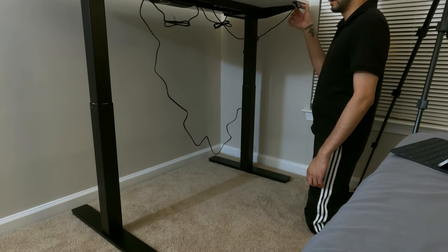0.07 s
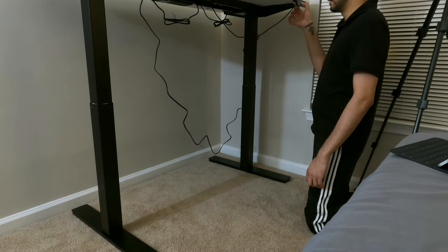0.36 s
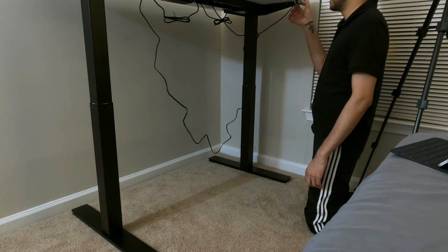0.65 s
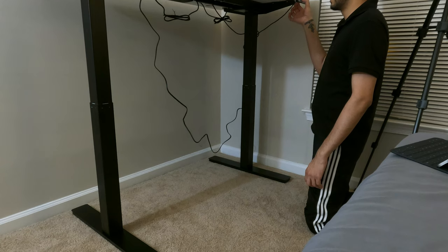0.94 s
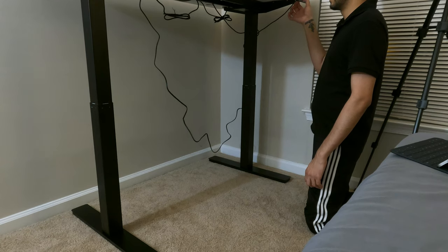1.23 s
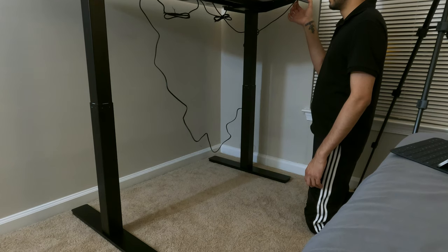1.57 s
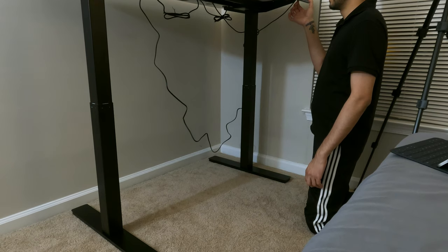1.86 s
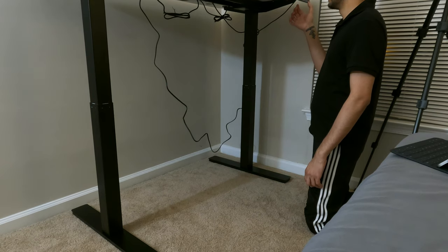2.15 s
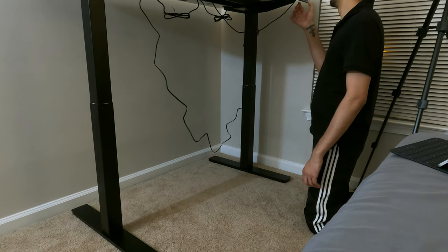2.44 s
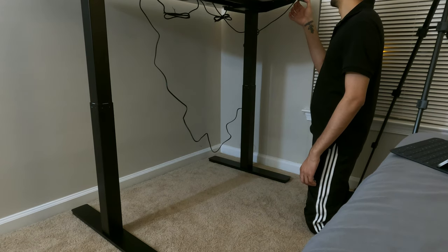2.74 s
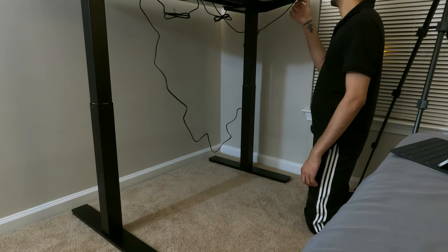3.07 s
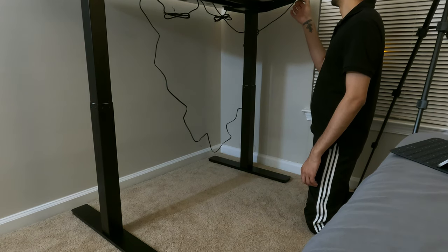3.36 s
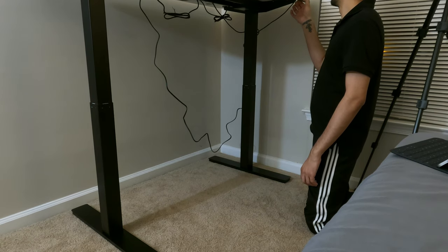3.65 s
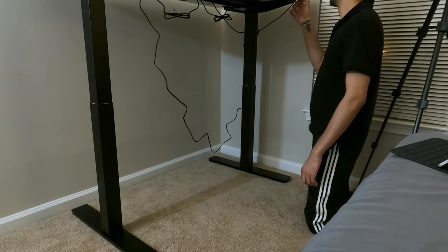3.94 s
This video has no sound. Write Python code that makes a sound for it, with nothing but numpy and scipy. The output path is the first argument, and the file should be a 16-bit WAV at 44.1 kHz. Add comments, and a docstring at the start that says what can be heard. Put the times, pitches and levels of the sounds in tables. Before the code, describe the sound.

A standing desk's motors whine steadily with a light rasp and low gear rumble in a small carpeted room. From about 0.8 seconds the pitch falls, with faint squeaks and a knock near 1.3 seconds. The desk stops at 1.7 seconds with a quick clatter and a deep shudder. A low, wavering appliance hum continues, with one sharp click at about 3.3 seconds.

```python
"""A steady whine comes first: the two leg motors of a standing desk, in a small carpeted bedroom.
Armatures sing, brushes rasp once a half turn, the columns slide and the gears rumble in the frame;
an appliance hums behind, beating against the mains. As the motors ramp down the whine falls, the
drive squeaks and the frame knocks. A quick clatter marks the stop, a deep shudder follows, and later
comes one sharp click."""
import sys
import numpy as np
from scipy import signal
from scipy.fft import rfft, irfft
from scipy.io import wavfile
from scipy.ndimage import uniform_filter1d, map_coordinates

SR = 44100
rng = np.random.default_rng(int(sys.argv[2]) if len(sys.argv) > 2 else 0)


def transcribe(signal):
    """Save signal, clipped to [-1, 1], as a 16-bit WAV file at the path in sys.argv[1]."""
    frames = np.atleast_2d(signal).T
    limited = np.clip(frames, -1, 1)
    pcm = np.round(limited * 32767).astype(np.int16)
    wavfile.write(sys.argv[1], SR, pcm)


N = 176400
T = np.arange(N) / SR
SHAFT_HZ, BRAKE_S, STOP_S = 81.03, .775, 1.69


def undb(db):
    """Amplitude grows tenfold for every 20 dB."""
    return 10 ** (np.asarray(db) / 20)


def unit(x):
    """Normalisation to rms 1."""
    return x / np.sqrt(np.mean(x ** 2))


def curve(table, column=1):
    """Gain envelope, interpolated in decibels between rows of time and level."""
    rows = np.array(table)
    return undb(np.interp(T, rows[:, 0], rows[:, column]))


def walk(rate):
    """Random modulation: about `rate` steps a second, smoothed, at rms 1."""
    k = int(SR / rate)
    steps = np.repeat(rng.standard_normal(N // k + 2), k)
    return unit(uniform_filter1d(uniform_filter1d(steps, k), k)[:N])


def colour(x, points):
    """Minimum-phase filter through (Hz, dB) points; it keeps the power of white noise."""
    hz, db = np.array(points).T
    f = np.maximum(np.arange(N + 1) * SR / (2 * N), 1)
    bass_rolloff = np.minimum(f / hz[0], 1) ** 2
    gain = unit(undb(np.interp(np.log(f), np.log(hz), db)) * bass_rolloff + 1e-6)
    cepstrum = irfft(np.log(gain))
    cepstrum[1:N] *= 2  # folding the cepstrum makes the filter causal
    cepstrum[N + 1:] = 0
    return irfft(rfft(x, 2 * N) * np.exp(rfft(cepstrum)))[..., :N]


def stereo_noise(correlation):
    """Partial coherence: white noise mixed from a common and an opposed part."""
    mid, side = rng.standard_normal((2, N))
    return unit(np.sqrt(1 + correlation) * mid + np.sqrt(1 - correlation) * np.array([side, -side]))


def room(x, wet_db):
    """Reverberation: direct sound plus a diffuse tail; carpet and bedding absorb the treble soonest."""
    noise = stereo_noise(correlation=.5)
    below = lambda hz: signal.sosfiltfilt(signal.butter(2, hz, fs=SR, output="sos"), noise)
    fade = lambda t60: np.exp(-np.log(1000) * T / t60)
    bass, body = below(hz=900), below(hz=8600)
    tail = bass * fade(t60=.49) + (body - bass) * fade(t60=.38) + (noise - body) * fade(t60=.21)
    tail = unit(tail * (T > .003)) / np.sqrt(N)  # reflections arrive after 3 ms
    return x + undb(wet_db) * signal.fftconvolve(x[None], tail, axes=1)[:, :N]


def shaft_tone(turns, order, shake_rad=0):
    """Modulation of a shaft order: its level flutters, and play in the gears can shake its phase."""
    shake = shake_rad * walk(rate=160) if shake_rad else 0
    phase = 2 * np.pi * (order * turns + rng.random()) + shake
    return np.sqrt(2) * np.sin(phase) * undb(2.5 * walk(rate=13.8))


# Whine of armature and gears. Each row: multiple of the shaft rate, relative level in dB.
SHAFT_ORDERS = [(1, -51.5), (1.72, -50), (2.6, -53.5), (4, -61), (4.45, -57.5), (5.2, -63), (6, -74),
                (7.05, -69), (8, -62.5), (16, -67.5), (17, -80), (19, -68.5), (27.2, -80), (28, -66.5),
                (30, -63.5), (32, -68.5), (33, -67.5), (35, -68.5), (46, -70.5), (48, -65.5), (49, -70.5),
                (50, -71.5), (58.3, -71), (59.5, -72), (72, -71.5), (84, -78), (96, -77), (108, -80)]


def whine(hz, turns):
    """Rotating parts radiate at fixed multiples of the shaft rate, more weakly as they slow."""
    orders = sum(undb(db) * shaft_tone(turns, order) for order, db in SHAFT_ORDERS)
    return orders * (hz / SHAFT_HZ) ** 2.05


# Slot tones. Each row: time in seconds, relative levels of the fundamental and the octave in dB.
SLOT_LEVELS = [(0, -61.5, -55), (.2, -61, -56.5), (.29, -58, -54), (.42, -57, -56), (.62, -61, -60),
               (.77, -55.5, -58), (.825, -45.5, -62), (.92, -55, -65), (.97, -52, -65), (1.06, -58, -65),
               (1.135, -50, -57), (1.23, -56, -63), (1.3, -50.5, -65), (1.4, -61, -68), (1.47, -69, -79),
               (1.69, -75, -85)]
SLOTS = 12


def slot_tones(turns, tight):
    """Armature slots sound at their passing rate and its octave; a sideband swells at the tight spot."""
    sideband = undb(-2.5 + 7.5 * tight) * shaft_tone(turns, order=22.93)
    fundamental = shaft_tone(turns, SLOTS, shake_rad=.28)
    octave = shaft_tone(turns, 2 * SLOTS, shake_rad=.28)
    return curve(SLOT_LEVELS) * fundamental + curve(SLOT_LEVELS, column=2) * (octave + sideband)


# Housing resonances. Each row: frequency in Hz, width in Hz, relative peak level in dB.
HOUSING_MODES = [(2680, 180, -57.5), (4160, 130, -59), (4530, 150, -61), (5750, 200, -66), (6400, 200, -62)]
# Slot overtones. Each row: multiple of the slot rate, relative level in dB.
SLOT_OVERTONES = [(3, 1), (4, -4), (5, 0), (6, -6.5), (7, -11), (8, -8), (9, 2)]


def housing_ring(hz, turns):
    """Forced resonance: slot overtones swell as they sweep through the modes of the housing."""
    driven = np.clip((BRAKE_S - T) / .05, 0, 1)  # the overtones are weaker until braking starts
    strength = undb(-10 * driven) * (hz / SHAFT_HZ) ** 1.6
    out = 0
    for multiple, overtone_db in SLOT_OVERTONES:
        order = SLOTS * multiple
        response = sum(undb(db) / (1 + (2 * (order * hz - mode_hz) / width) ** 2)
                       for mode_hz, width, db in HOUSING_MODES)
        overtone = shaft_tone(turns, order, shake_rad=.8) * undb(overtone_db + 3 * walk(rate=35))
        out = out + strength * response * overtone
    return out


def brushes(turns):
    """Friction noise that partly repeats with every turn and swells twice a turn."""
    count, repeat_share = int(SR / SHAFT_HZ), .32
    surface = map_coordinates(rng.standard_normal(count), [turns % 1 * count], mode="grid-wrap")
    scrape = np.sqrt(repeat_share) * surface + np.sqrt(1 - repeat_share) * rng.standard_normal(N)
    return unit(scrape * np.exp(.36 * np.cos(4 * np.pi * turns)))


# Spectrum of the brush rasp. Each row: frequency in Hz, relative density in dB.
BRUSH_SPECTRUM = [(400, -6), (700, -8), (1000, -7), (1500, -9), (1950, -4.5), (2600, -11), (3300, -14.5),
                  (4000, -11), (4600, -12.5), (5200, -17.5), (6500, -14.5), (8200, -25), (9200, -23),
                  (11000, -34), (12300, -33.5), (15000, -69)]
# Envelope of the rasp. Each row: time in seconds, relative level in dB.
BRUSH_ENVELOPE = [(0, -46.5), (.8, -46.5), (1.05, -49), (1.3, -51), (1.5, -55.5), (1.69, -58.5)]


def motors(running):
    """Beating: two motors follow one speed ramp at slightly different rates."""
    slowing_hz_per_s, wander, sag = 61.5, .0025, .00899
    speed = np.maximum(SHAFT_HZ - slowing_hz_per_s * np.maximum(T - BRAKE_S, 0), 1)
    tight = np.exp(-((T - .295) / .04995) ** 2)  # a tight spot in the travel
    tones, rasp = 0, 0
    for speed_ratio, gain in ((1, 1), (1.009, undb(-8.5))):
        hz = speed * speed_ratio * (1 + wander * walk(rate=9) - sag * tight)
        turns = np.cumsum(hz) / SR
        tones = tones + gain * (whine(hz, turns) + slot_tones(turns, tight) + housing_ring(hz, turns))
        rasp = rasp + gain * brushes(turns)
    rasp = colour(unit(rasp), BRUSH_SPECTRUM) * curve(BRUSH_ENVELOPE)
    return room(tones * running * undb(-1.5), wet_db=-9) + room(rasp * running * undb(-6), wet_db=1)


# Spectrum of the sliding columns. Each row: frequency in Hz, relative density in dB.
SLIDE_SPECTRUM = [(400, -4), (800, -5.5), (1400, 14.5), (2000, -3.5), (3000, -3.5), (6000, -41.5),
                  (14000, -68)]
# Envelope of the sliding. Each row: time in seconds, level in dB.
SLIDE_ENVELOPE = [(0, -58), (.75, -60.5), (1.1, -54), (1.35, -53.5), (1.69, -61.5)]


def column_slide():
    """Sliding friction in the leg columns gives a band of noise near 1400 Hz."""
    return colour(stereo_noise(correlation=.66), SLIDE_SPECTRUM) * curve(SLIDE_ENVELOPE)


# Spectrum of the gear rumble. Each row: frequency in Hz, relative density in dB.
RUMBLE_SPECTRUM = [(35, -49.5), (60, -8.5), (80, -1.5), (110, -4.5), (140, -2), (175, -11.5), (220, -2.5),
                   (270, -10), (340, -16), (500, -32), (900, -59.5), (5000, -90)]
# Envelope of the rumble. Each row: time in seconds, level in dB.
RUMBLE_ENVELOPE = [(0, -44), (.28, -42), (.45, -47.5), (.9, -45.5), (1.25, -44.5), (1.5, -49), (1.69, -63)]


def gear_rumble():
    """Structure-borne sound: the frame radiates the gears' vibration as low noise."""
    return colour(stereo_noise(correlation=.95), RUMBLE_SPECTRUM) * curve(RUMBLE_ENVELOPE)


# Appliance hum. Each row: time in seconds, level of the fundamental in dB, level of the octave in dB.
HUM_LEVELS = [(0, -53, -43), (.6, -49, -51), (1.3, -47, -45), (2.2, -46, -45), (2.7, -49, -53.5),
              (3.15, -55, -47.5), (3.6, -55.5, -46), (4, -55, -46.5)]


def appliance_hum():
    """Interference: the hum's octave beats against that of the mains about three times a second."""
    appliance_hz, mains_hz, in_phase_s = 58.54, 60, 3.58
    angle = 2 * np.pi * (T - in_phase_s)
    fundamental = curve(HUM_LEVELS) * np.cos(appliance_hz * angle + 2 * np.pi * rng.random())
    fundamental *= undb(1.4 * walk(rate=5.65))
    octave = curve(HUM_LEVELS, column=2) * np.cos(2 * appliance_hz * angle)
    mains = undb(-57) * np.cos(2 * mains_hz * angle)
    return np.sqrt(2) * (fundamental + octave + mains)


# Spectra of building murmur and room hiss. Each row: frequency in Hz, relative density in dB.
BUILDING_SPECTRUM = [(15, -5), (35, -1.5), (55, 3.5), (90, 2), (140, -0.5), (180, 1.5), (230, -2.5),
                     (300, -11), (450, -55.5)]
AIR_SPECTRUM = [(250, -4), (450, -10), (650, -15.5), (850, -19), (1200, -14), (1600, -20.5), (2100, -26.5),
                (3200, -29), (5750, -29.5), (7600, -36.5), (9000, -45), (11000, -65), (15000, -71.5)]


def ambience():
    """The noise floor: a wavering low murmur of the building under a soft, steady hiss."""
    murmur = undb(-51.5) * colour(stereo_noise(correlation=.65), BUILDING_SPECTRUM)
    murmur *= undb(2.76 * walk(rate=6.84))
    return murmur + undb(-60) * colour(stereo_noise(correlation=.31), AIR_SPECTRUM)


# Squeaks near standstill. Each row: centre in seconds, pitch in Hz, level in dB.
DRIVE_SQUEAKS = [(1.215, 5780, -65), (1.35, 4500, -67), (1.43, 4330, -63), (1.455, 5740, -60),
                 (1.475, 3750, -66), (1.485, 5270, -67), (1.552, 4470, -61.5), (1.61, 4020, -67),
                 (1.64, 3700, -70)]


def squeaks():
    """Stick-slip: the slow-turning drive catches in brief, falling chirps."""
    half_width_s, fall_hz_per_s, jitter_hz = .017, 3500, 95
    out = 0
    for centre, hz, db in DRIVE_SQUEAKS:
        offset = np.clip(T - centre, -.1, .1)
        pitch = hz - fall_hz_per_s * offset + jitter_hz * walk(rate=300)
        chirp = np.sqrt(2) * np.sin(2 * np.pi * np.cumsum(pitch) / SR)
        out = out + undb(db) * chirp * np.exp(-(offset / half_width_s) ** 2)
    return room(out, wet_db=-1.5)


def chatter(envelope):
    """Spectral whitening evens out a noise burst, so that no chance pitch sticks out."""
    burst = envelope * rng.standard_normal(N)
    bins = rfft(burst)
    whitened = irfft(bins / (np.abs(bins) + 1e-9) ** .8, N)
    return unit(whitened * (envelope > 0)) * np.std(burst)


# Spectra of the five impacts. Each row: frequency in Hz, relative density in dB.
KNOCK = [(300, -16.5), (600, -5), (850, -14.5), (1200, 0), (1900, -5.5), (2900, -20.5), (5000, -15),
         (7100, -24), (8300, -30.5), (10500, -40), (12300, -32), (15000, -52)]
TAP = [(400, -18), (1200, -13.5), (1850, 0.5), (2300, -12.5), (3000, -24), (9000, -39)]
STOP_CLICK = [(300, -4.5), (450, -9.5), (750, -3.5), (1050, -9.5), (1300, -5.5), (1850, -5.5),
              (2400, -11.5), (3400, -14.5), (4900, -7), (5300, -4), (5600, 4.5), (5950, -3.5), (7100, -6.5),
              (8000, -18), (9100, -13), (10000, -28), (12300, -28.5), (15000, -41.5)]
BUMP = [(250, -5.5), (480, -8), (740, -0.5), (1000, -10.5), (1300, -5), (2200, -20), (6000, -41)]
LATE_CLICK = [(350, -16.5), (750, -22), (1200, -3.5), (1500, -8), (2000, -4), (2700, -3.5), (3100, -9),
              (3600, -7.5), (5400, -11.5), (7500, -21), (9500, -33.5), (12200, -37.5), (14500, -63)]
# Modes of the struck parts. Each row: frequency in Hz, level against the impact in dB, T60 in seconds.
KNOCK_MODES = [(1136, -2, .075)]
STOP_MODES = [(716, -15.5, 0.11), (5510, -8.5, .11), (5630, -14, 0.15), (7270, -24, .15)]
LATE_MODES = [(203, -14, .4), (262, -14, 0.38), (1209, -11.5, .16), (1307, -15, 0.12), (2180, -18, .2),
              (2735, -15, .2), (3590, -16, .12)]
# Clicks and knocks. Each row: start in seconds, level in dB, rise and decay in seconds,
# reverberation level in dB, spectrum, modes.
IMPACTS = [(1.2888, -35.5, 0.0008, 0.011, -3, KNOCK, KNOCK_MODES),
           (1.6891, -38.5, 0.0011, 0.0044, -3, TAP, []),
           (1.692, -29, 0.0036, 0.0041, -5, STOP_CLICK, STOP_MODES),
           (1.736, -44, .002, 0.0076, -3, BUMP, []),
           (3.2564, -31, 0.0006, 0.0089, 0, LATE_CLICK, LATE_MODES)]


def clicks():
    """Impact excitation: each click is a brief chatter; the harder ones leave damped modes ringing."""
    bursts, rings = 0, np.zeros(N)
    for start, db, rise, decay, wet_db, spectrum, modes in IMPACTS:
        age = np.maximum(T - start, 0)
        attack = np.minimum(age / rise, 1)
        envelope = attack * np.exp(-np.maximum(age - rise, 0) / decay)
        bursts = bursts + room(undb(db) * colour(chatter(envelope), spectrum), wet_db)
        for hz, mode_db, t60 in modes:
            mode = np.sin(2 * np.pi * (hz * age + rng.random())) * np.exp(-np.log(1000) * age / t60)
            rings += undb(db + mode_db) * attack * mode
    return bursts + room(rings, wet_db=-10)


# Thuds after the last two clicks. Each row: centre in seconds, level in dB, half width in seconds.
FRAME_THUDS = [(1.738, -44.5, 0.036), (3.287, -53, 0.052)]
# Spectrum of the settling frame. Each row: frequency in Hz, relative density in dB.
THUD_SPECTRUM = [(170, 4.5), (300, -1), (400, -8), (550, -15.5), (720, -4), (900, -9), (1100, -18),
                 (1600, -18), (3000, -21), (8000, -53)]


def shudder():
    """Transient vibration: the frame settles with soft thuds and one very deep swell after the stop."""
    thuds = sum(undb(db) * np.exp(-((T - centre) / width) ** 2) for centre, db, width in FRAME_THUDS)
    sway_hz, centre_s, half_width_s = 22.1, 1.883, .13
    swell = undb(-37) * np.exp(-((T - centre_s) / half_width_s) ** 2)
    sway = np.sqrt(2) * np.sin(2 * np.pi * sway_hz * T)
    return thuds * colour(stereo_noise(correlation=.69), THUD_SPECTRUM) + swell * sway


def scene():
    """Superposition of all sources; the desk is a touch louder and later on the left."""
    running = np.clip((STOP_S - T) / .0055, 0, 1)
    desk = motors(running) + (column_slide() + gear_rumble()) * running + squeaks() + clicks()
    left, right = desk * undb([[.3], [-.3]])
    hz, lag_s = np.arange(N // 2 + 1) * SR / N, 1.3e-5
    left = irfft(rfft(left) * np.exp(-2j * np.pi * hz * lag_s), N)
    return np.array([left, right]) + shudder() + appliance_hum() + ambience()


def record(dry):
    """Band limiting: a steep elliptic low-pass cuts the treble above 15.3 kHz."""
    return signal.sosfilt(signal.ellip(8, .2, 70, 15300, fs=SR, output="sos"), dry)


dry = scene()
out = record(dry)
transcribe(out)
```